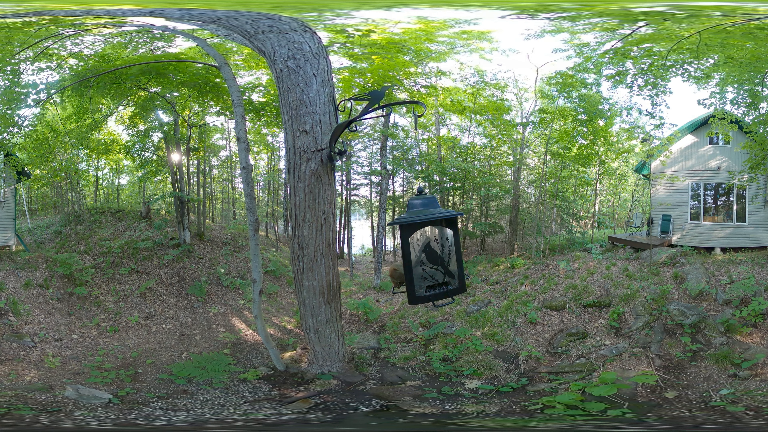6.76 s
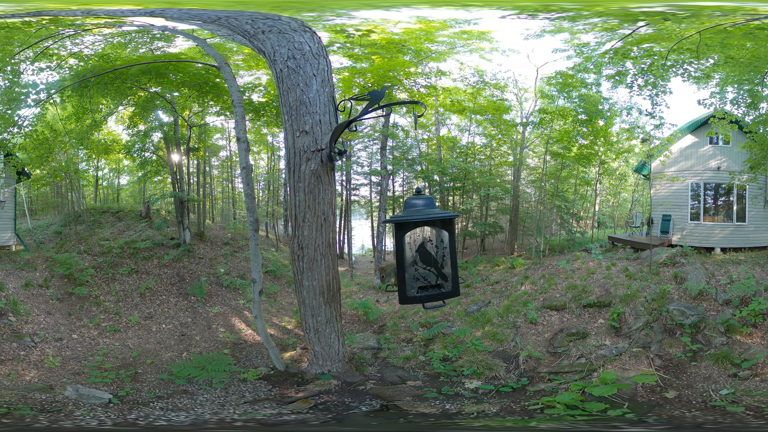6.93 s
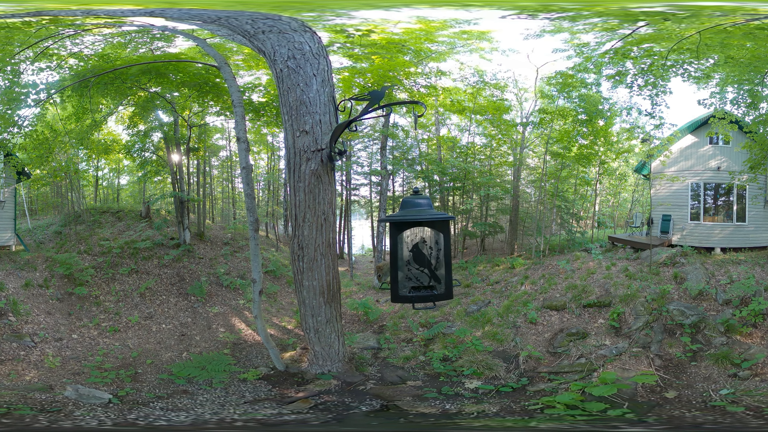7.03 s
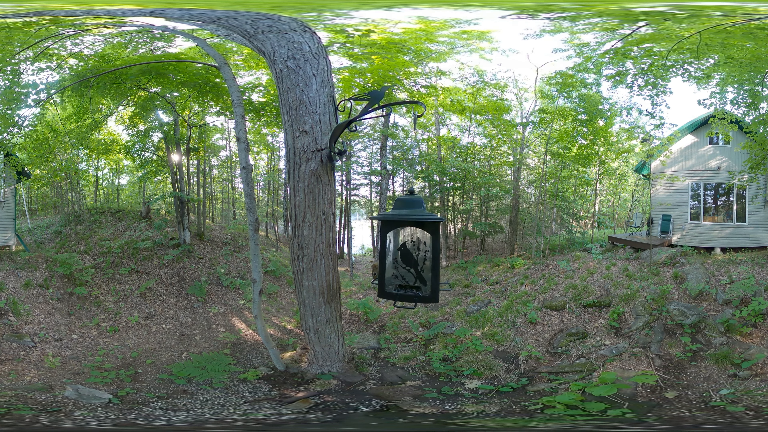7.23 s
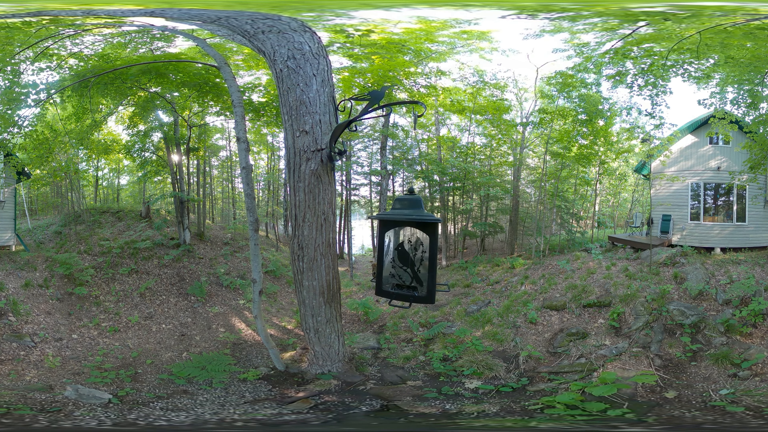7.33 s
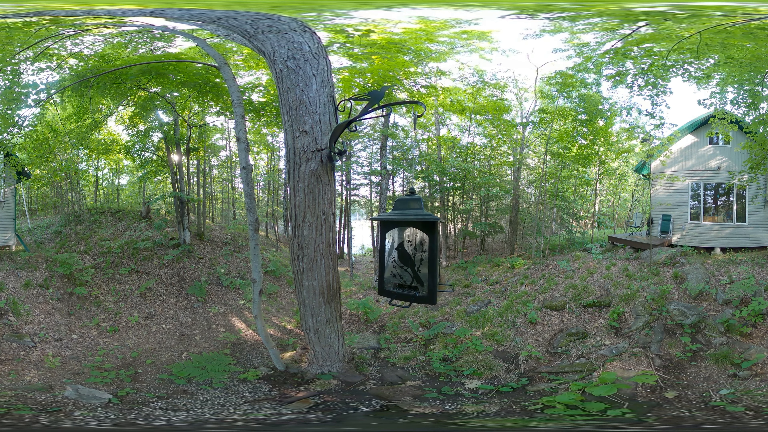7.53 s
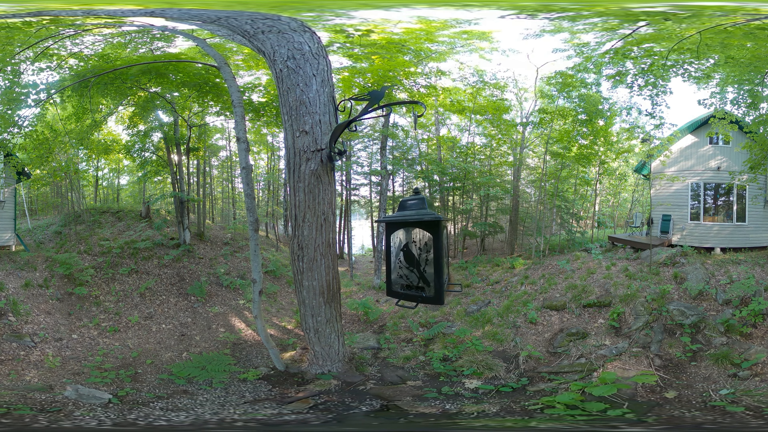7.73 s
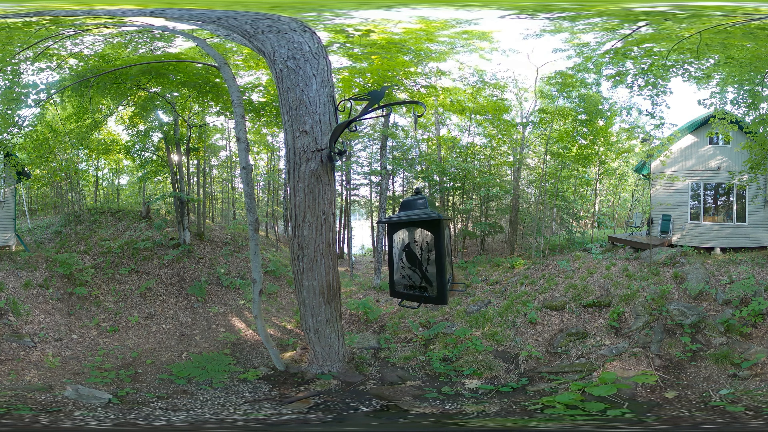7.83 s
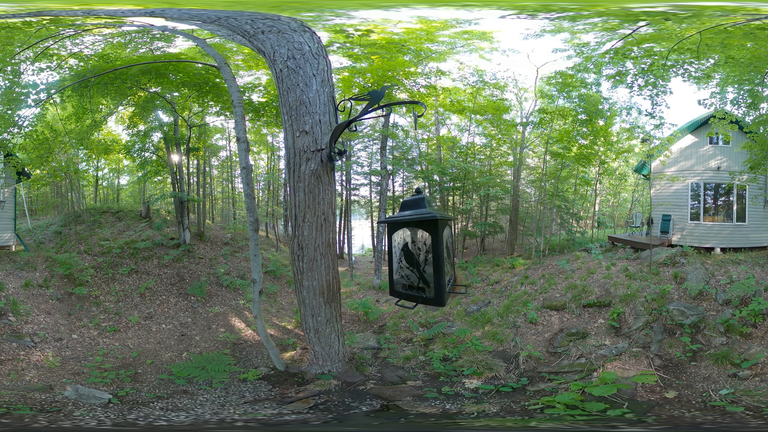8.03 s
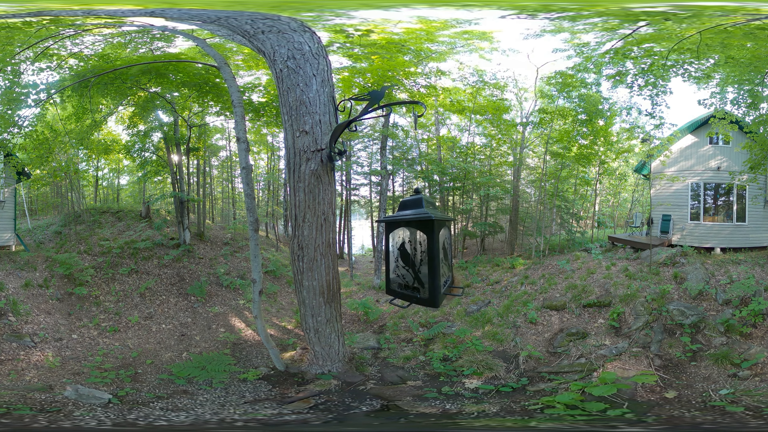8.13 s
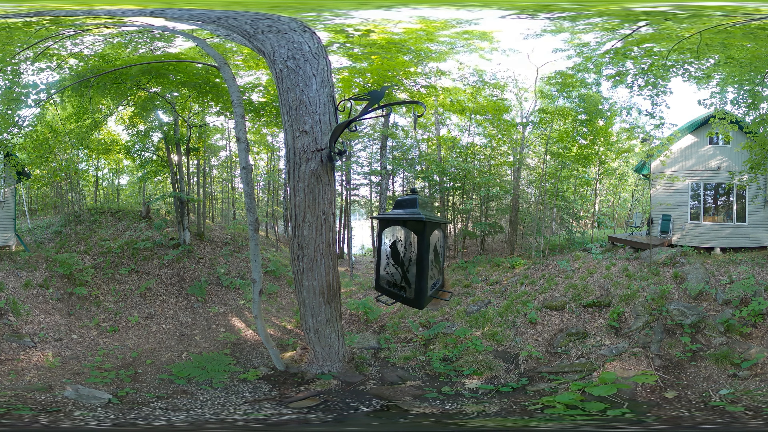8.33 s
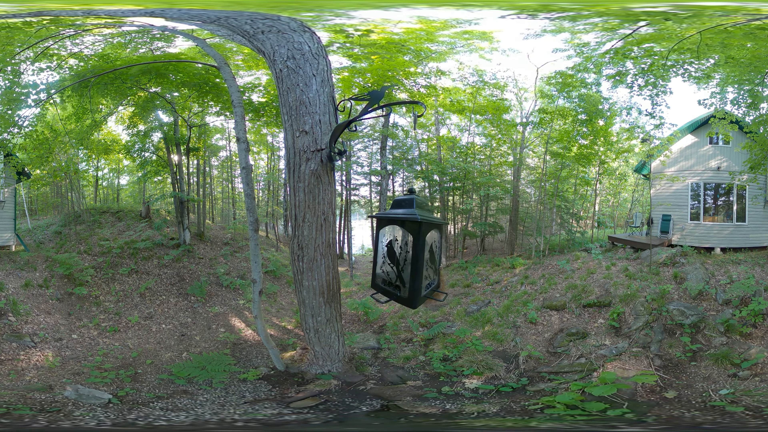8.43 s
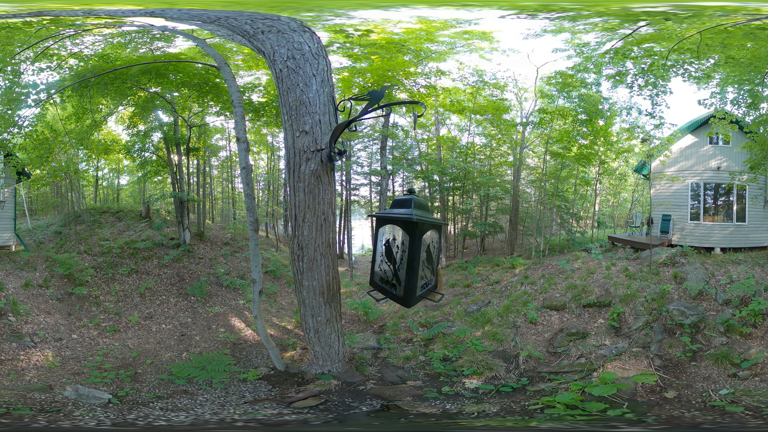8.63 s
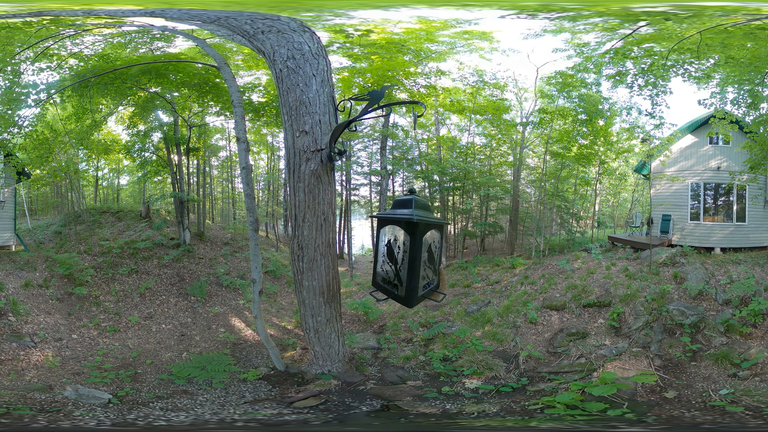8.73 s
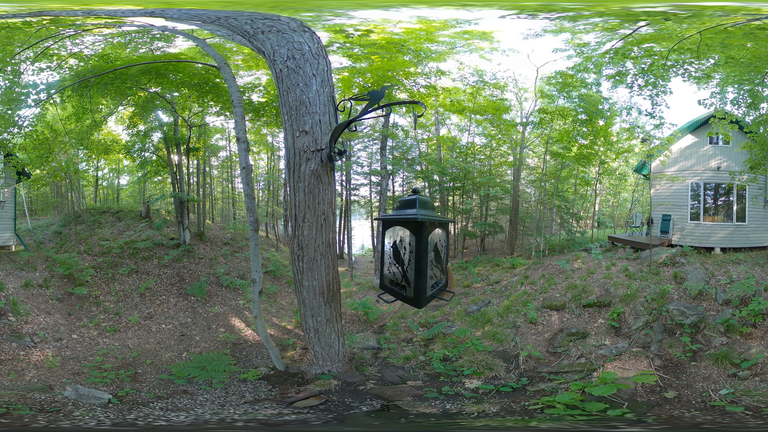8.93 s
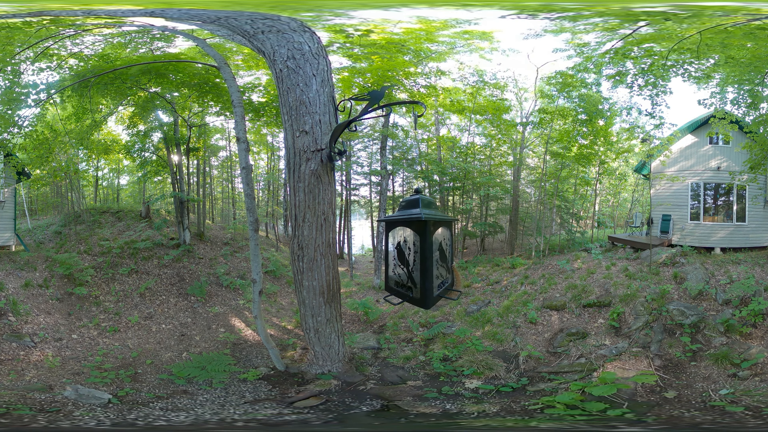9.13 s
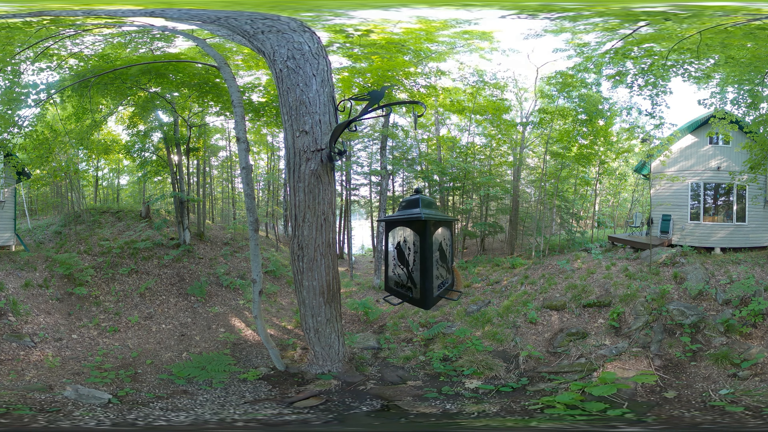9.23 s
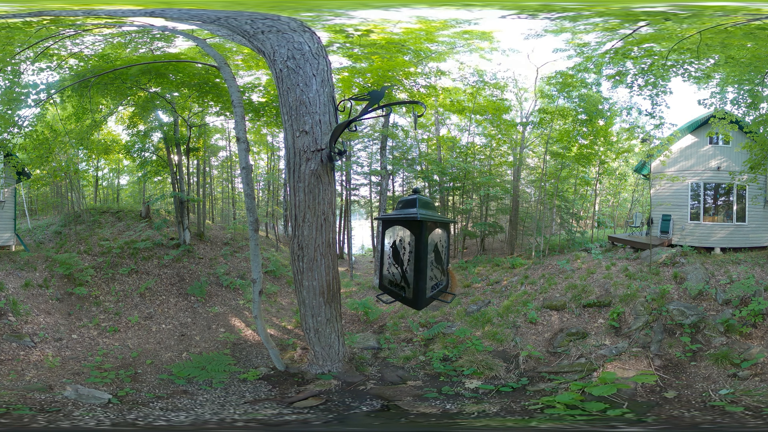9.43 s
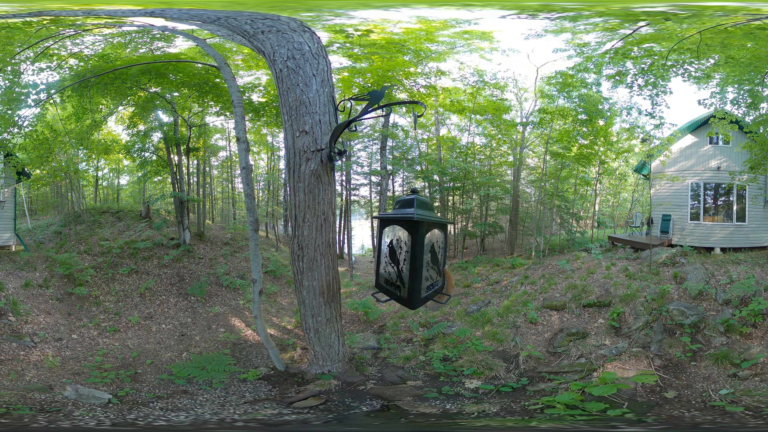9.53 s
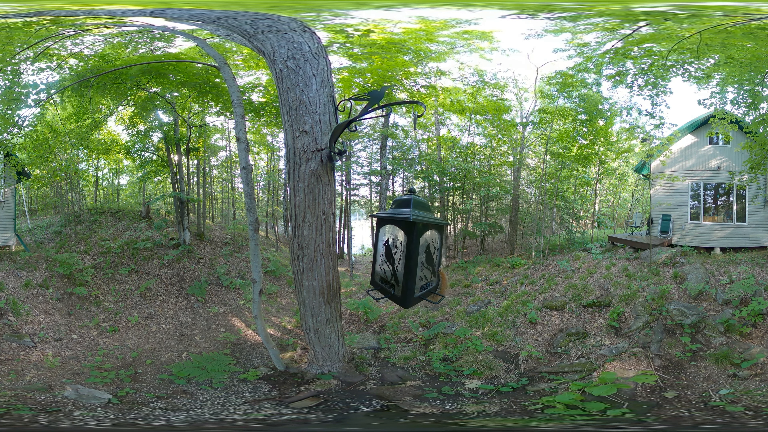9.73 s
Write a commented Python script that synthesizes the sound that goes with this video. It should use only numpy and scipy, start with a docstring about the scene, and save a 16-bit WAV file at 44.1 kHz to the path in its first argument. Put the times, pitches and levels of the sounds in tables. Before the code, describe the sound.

At 0 s a soft low thud on a hanging feeder, and at once a squirrel very near the microphone begins creaky chucks, about six a second. Each is a tiny tick and catch, a hard bright crack, then a short rasping, wavering creak. More bumps and claw scrapes come until 0.5 s. The chucks are strong and regular to about 2.3 s, where a thin squeak, a small claw click and a light bump fall. From 2.5 to 5 s they grow softer and less even, some with longer creaks. A sharp loud pair comes near 5.3 s, then quieter chucks, a brief lift around 7 s, and a gradual weakening to the end. Echoing bird whistles sound near 6.2, 8 and, clearest, 9.5 s. Occasional dry snaps and faint squeaks dot the run. Beneath lie a low air rumble and faint forest hush; the sound is close, nearly dry, slightly dull on top and almost mono.

```python
"""A soft thud on the microphone's mount, and at once a squirrel close by: creaky chucks, about six a second.
Each is a tick, a catch, a hard crack and a wavering creak: trains of some 500 pulses a second that excite
the resonances of body and mouth. Bumps ring the modes of the mount; claw scrapes and short dry snaps are
decaying noise; thin squeaks and bird whistles are gliding sines, the birds heard through scattered echoes.
Beneath lie a low rumble of air and a faint forest hush, both of them shaped noise."""
import sys
import numpy as np
from scipy import signal
from scipy.fft import rfft, irfft
from scipy.io import wavfile

SR = 44100
rng = np.random.default_rng(int(sys.argv[2]) if len(sys.argv) > 2 else 0)


def generate_wav(signal):
    """Clip the signal to [-1, 1] and save it as 16-bit WAV at the path in sys.argv[1]."""
    frames = np.transpose(np.atleast_2d(signal))
    scaled = np.clip(frames, -1, 1) * 32767
    pcm = np.round(scaled).astype(np.int16)
    wavfile.write(sys.argv[1], SR, pcm)


N = 431298
TIME = np.arange(N) / SR
# the window for one burst: samples, seconds, and frequencies in Hz (offset by 1 to avoid zero)
SIZE = 8192
LOCAL = np.arange(SIZE) / SR
BINS = np.fft.rfftfreq(SIZE, 1 / SR) + 1


def undb(db):
    """Logarithmic level: decibels become an amplitude ratio."""
    return 10 ** (np.asarray(db) / 20)


def unit(x):
    """Power normalization: scale to an rms of 1."""
    return x / np.sqrt(np.mean(x ** 2) + 1e-20)


def read(table, at):
    """Linear interpolation: a table's other columns at one value of its first."""
    first, *columns = np.transpose(table)
    return [np.interp(at, first, column) for column in columns]


def wander(t, rate):
    """Random modulation: 128 random values, rate per unit of t, joined by lines; the last one holds."""
    return np.interp(t * rate, np.arange(128), rng.standard_normal(128))


def noise(points):
    """Spectral shaping: white noise takes on a (frequency_hz, relative_level_db) curve, at rms 1."""
    hz, db = np.transpose(points)
    f = np.fft.rfftfreq(N, 1 / SR) + 1
    white = rfft(rng.standard_normal(N))
    return unit(irfft(white * undb(np.interp(np.log(f), np.log(hz), db)), N))


def edge(ratio, order):
    """Butterworth magnitude: gain falls as the ratio passes 1; an inverted ratio makes a high-pass."""
    return (1 + ratio ** (2 * order)) ** -.5


def resonate(modes, f):
    """Modal superposition: complex response of parallel resonances, neighbours of opposite sign."""
    total = 0
    for k, (hz, width, db) in enumerate(modes):
        total = total + (-1) ** k * undb(db) / (1 + 1j * (f * f - hz * hz) / (f * width))
    return total


def butter(x, hz, kind, order):
    """Linear filtering: a causal Butterworth filter."""
    return signal.sosfilt(signal.butter(order, hz, kind, fs=SR, output="sos"), x)


def add(out, s, x):
    """Superposition: mix x into out from time s."""
    i = int(round(s * SR))
    a, b = max(i, 0), min(i + len(x), len(out))
    out[a:b] += x[a - i:b - i]


def echoes(x, t60):
    """Diffuse reverberation: convolution with decaying noise of unit energy; t60 in seconds."""
    t = TIME[:SR]
    tail = rng.standard_normal(SR) * undb(-60 * t / t60) * np.minimum(t / 0.0022, 1)
    return signal.fftconvolve(x, tail / np.linalg.norm(tail))[:N]


def whistle(t, hz):
    """Frequency modulation: a slightly trembling sine that fades in and out."""
    cycles = np.cumsum(hz * (1 + 0.045 * wander(t, 600))) / SR
    return np.sin(2 * np.pi * cycles) * signal.windows.tukey(len(t), .3)


# level of the air's rumble: time_s, level_db
RUMBLE_LEVEL = [(2.8, -42.5), (5.3, -50.5), (8.8, -44.5), (9.6, -69)]
# spectrum of the still forest: frequency_hz, relative_level_db (per Hz)
FOREST_SPECTRUM = [(90, -19), (155, 2.5), (250, -4), (1500, -12.5), (8000, -15), (13000, -30)]
FOREST_DB = -60


def air():
    """Broadband noise: slow air rocks the microphone at low frequency, over a faint forest hush."""
    rumble = noise([(8, -31.0), (22, 20.0), (32, 3.0), (48, -11.0), (400, -110)])
    level_db = read(RUMBLE_LEVEL, TIME)[0]
    return rumble * undb(level_db) + noise(FOREST_SPECTRUM) * undb(FOREST_DB)


# bird calls, each a list of glide points: time_s, pitch_hz (before the tremble), level_db (before echoes)
BIRD_CALLS = [
    [(6.14, 5050, -63), (6.2, 4140, -51)],
    [(6.25, 2960, -33), (6.3, 3450, -53), (6.36, 2050, -44.5)],
    [(7.9, 2340, -53), (8.0, 2520, -51), (8.1, 3940, -43)],
    [(9.503, 4470, -20), (9.514, 6570, -41.5), (9.56, 6020, -58), (9.62, 4260, -40)],
]


def birds():
    """Pure-tone glides: each whistle moves in straight lines of pitch and level between its points."""
    out = np.zeros(N)
    for call in BIRD_CALLS:
        s, hz, db = np.transpose(call)
        t = np.arange(s[0], s[-1], 1 / SR)
        add(out, s[0], whistle(t - s[0], np.interp(t, s, hz)) * undb(np.interp(t, s, db)))
    return out


# bumps on the mount: start_s, relative_level_db, push_hz (the frequency that the push favours)
BUMPS_ON_MOUNT = [(.001, -11.5, 112.3), (0.07, -31, 150), (0.176, -16.5, 130), (0.21, -27.5, 67.6),
                  (0.432, -8, 146), (0.5, -22, 68), (1.196, -32.5, 33), (2.371, -22.5, 144.5),
                  (2.379, -34.5, 302), (2.41, -38, 71), (4.562, -38, 287), (4.588, -31, 88)]
# modes of the mount: frequency_hz, relative_level_db, t60_s
MOUNT_MODES = [(32.6, 5.5, 0.47), (68.4, 7.5, 0.35), (113.5, -3, 0.31), (140.8, -4, 0.36),
               (162.6, -7, 0.58), (200.4, -5, 0.48), (249, 0, 0.33), (328, -2, 0.44), (396, 3.5, 0.38)]
# modes that one claw click excites: frequency_hz, peak_level_db, t60_s
CLICK_MODES = [(2280, -37, .04), (2930, -42, .05)]
CLICK_S = 2.402  # start


def mount():
    """Modal excitation: soft pushes ring the modes near their own speed; one claw clicks on the mount."""
    out, t = np.zeros(N), TIME[:SR]
    for s, db, push_hz in BUMPS_ON_MOUNT:
        ring = np.zeros(SR)
        for hz, mode_db, t60 in MOUNT_MODES:
            octaves_off = np.log2(hz / push_hz)
            mode = undb(mode_db - 60 * t / t60) * np.sin(2 * np.pi * hz * t)
            ring += mode / (1 + (octaves_off / 0.23) ** 2)
        add(out, s, undb(db) * ring * (1 - np.exp(-t / 0.0097)))
    for hz, db, t60 in CLICK_MODES:
        add(out, CLICK_S, undb(db - 60 * t / t60) * np.sin(2 * np.pi * hz * t))
    return out


# scrapes of the feet: start_s, level_db (before the envelope)
FOOT_SCRAPES = [(.062, -32), (0.089, -37.5), (.2, -28.5), (.28, -38), (.437, -23.5), (0.453, -28),
                (2.376, -44)]
SCRAPE_RISE_S, SCRAPE_DECAY_S = .003, .018  # time constants


def scrapes():
    """Friction noise: claws scrape as the squirrel shifts its feet; each scrape rises fast and dies away."""
    out, t = np.zeros(N), TIME[:SIZE]
    claws = noise([(300, -2.5), (1500, -2.5), (5000, -8), (9000, -18.5)])
    claws *= undb(1.6 * wander(TIME % .5, 230))  # roughness
    scrape = (1 - np.exp(-t / SCRAPE_RISE_S)) * np.exp(-t / SCRAPE_DECAY_S)
    for s, db in FOOT_SCRAPES:
        add(out, s, undb(db) * claws[int(s * SR):][:SIZE] * scrape)
    return out


# short dry snaps: start_s, level_db (before the decay)
DRY_SNAPS = [(.421, -28.5), (1.922, -34.5), (5.256, -37), (5.403, -29), (6.891, -45), (9.135, -39.5),
             (9.753, -46)]
SNAP_DECAY_S = 0.003  # time constant


def snaps():
    """Transient noise: short dry snaps, some sharp catches just ahead of a crack, others perhaps seed shell."""
    out, t = np.zeros(N), TIME[:SIZE]
    dry_noise = noise([(1200, -11), (3500, 0.5), (5500, 0), (9000, -23.5)])
    for s, db in DRY_SNAPS:
        add(out, s, undb(db) * dry_noise[int(s * SR) - SIZE:][:SIZE] * np.exp(-t / SNAP_DECAY_S))
    return out


# small squeaks between the chucks: start_s, length_s, start_pitch_hz (before the tremble), peak_level_db
FALLING_SQUEAKS = [(0.675, 0.054, 834, -49.5), (2.255, .015, 4520, -33), (3.774, 0.038, 826, -47),
                   (4.508, 0.051, 740, -48.5), (7.775, 0.033, 695, -45.5)]


def squeaks():
    """Falling pitch: thin notes slide down by about a quarter of their starting frequency."""
    out = np.zeros(N)
    for s, length, hz, db in FALLING_SQUEAKS:
        t = TIME[:int(length * SR)]
        add(out, s, undb(db) * whistle(t, hz * (1 - 0.26 * t / length)))
    return out


# upward bends of long creaks: peak_s, rise (share of the pulse rate)
CREAK_LIFTS = [(3.403, 0.37), (4.993, 0.66), (8.777, 0.64), (9.186, 0.59), (9.396, 0.55), (9.712, 0.73)]
LIFT_S = 0.016  # half-width of a bend, to 1/e
# shares of the pulse rate, and their time constants
OVERSHOOT, OVERSHOOT_S, DROOP, DROOP_S = .14, .023, 0.2398, .01
WAVER, WAVERS_PER_S = .06, 70
# a burst slips after this time or up to twice as long: the level sags, then the rate steps
SLIP_MIN_S, SLIP_STEP, SLIP_DB = .03, .06, -10


def pulse_phase(s, length, hz, jitter):
    """Frequency integration: the varying pulse rate sums to a phase in pulses; also counts the slips."""
    left = np.maximum(length - LOCAL, 0)
    slips = LOCAL / (SLIP_MIN_S * (1 + rng.random()))
    waver = WAVER * wander(LOCAL, WAVERS_PER_S) + SLIP_STEP * wander(np.floor(slips), 0.92)
    # the rate starts high, and droops as the effort is let go
    tune = 1 + OVERSHOOT * np.exp(-LOCAL / OVERSHOOT_S) - DROOP * np.exp(-left / DROOP_S)
    tune = tune * np.exp(waver)
    lift = 1 + sum(rise * np.exp(-((s + LOCAL - peak) / LIFT_S) ** 2) for peak, rise in CREAK_LIFTS)
    # the first pulses are the most uneven
    uneven = jitter * (0.5 + np.exp(-LOCAL / .03)) * wander(LOCAL, 526.2)
    rate = hz * lift * tune / tune[left > 0].mean() * np.exp(uneven)
    return np.cumsum(rate) / SR, slips


def pulse_train(phase, on):
    """Band-limited impulses: a windowed sinc at each whole phase, placed between samples."""
    at = np.interp(np.arange(int(phase[on][-1]) + 1), phase, np.arange(SIZE))
    taps = at.astype(int)[:, None] + np.arange(16)
    offset = taps - at[:, None] - 8
    pulses = np.zeros(SIZE)
    pulses[taps] = np.sinc(offset) * np.sinc(offset / 8)
    return pulses


RASP_WIDTH_HZ, TREBLE_WIDTH_HZ = 1300, 1040
# the top resonance: frequency_hz (before the scatter), width_hz, relative_level_db
TOP_RESONANCE = (8450, 1360, -1.3)
# each pass scatters the resonances by a share and adds random spectral ripples
SCATTER, RIPPLE_DB, RIPPLE_HZ = .025, 2.2, 450


def overtones(x, rasp_hz, treble_hz):
    """Source-filter principle: pulses ring the rasp and treble resonances, a little differently each time."""
    f = BINS * np.exp(SCATTER * rng.standard_normal())
    push = rfft(x) * undb(RIPPLE_DB * wander(BINS, 1 / RIPPLE_HZ))
    rasp = resonate([(rasp_hz, RASP_WIDTH_HZ, 0)], f)
    rasp = rasp * edge(f / (1.2 * rasp_hz), order=14) * edge(0.74 * rasp_hz / f, order=5)
    treble = resonate([(treble_hz, TREBLE_WIDTH_HZ, 0), TOP_RESONANCE], f)
    treble = treble * edge(0.5 * treble_hz / f, order=6)
    return np.array([irfft(push * rasp), irfft(push * treble)])


# resonances of the hollow body with the mouth at MOUTH_HZ: frequency_hz, width_hz, relative_level_db
MOUTH_HZ = 1420
BODY_MODES = [(457, 230, 0.46), (1098, 156, 0.56), (1450, 379, 1)]
# the mouth's shape moves the resonances: time_s, body_centre_hz, treble_hz (before the scatter)
MOUTH_SHAPE = [(0, 1427, 4750), (2, 1293, 4860), (2.55, 1476, 5330), (3.65, 1426, 5440), (5.3, 1365, 5230),
               (6.9, 1284, 5360), (7.3, 1483, 5400), (8.1, 1277, 4830), (8.55, 1500, 5280)]
FLUTTER_DB, TIRE_DB_PER_S = 3.5, -13


def burst(s, length, hz, rasp_hz, body_db, rasp_db, treble_db, jitter, rasp_fade_db, hiss):
    """Source-filter principle: one train of sharp pulses from time s, rung through body and mouth."""
    mouth_hz, treble_hz = read(MOUTH_SHAPE, s)
    left = np.maximum(length - LOCAL, 0)
    on = left > 0
    phase, slips = pulse_phase(s, length, hz, jitter)
    # hard bursts start at once, soft ones swell; the level flutters, tires, and sags before each slip
    swell = 1 - np.exp(-LOCAL / (0.00033 * undb(-.8 * (max(rasp_db, -42) + 46.5))))
    flutter_db = FLUTTER_DB * wander(LOCAL, 119.5)
    sag_db = TIRE_DB_PER_S * LOCAL + SLIP_DB * (slips % 1) ** 10
    pulses = pulse_train(phase, on) * swell * undb(flutter_db + sag_db)
    # above the lowest partial the pulses differ in size and a hiss follows each
    hiss_decay = np.exp(.5 * rng.standard_normal() - (phase % 1) / .5)
    grit = hiss * hiss_decay * on * swell * rng.standard_normal(SIZE)
    rough = pulses * undb(1.7 * wander(LOCAL, 590)) + grit
    # in the body a long creak settles into a steadier tone
    settling = pulses + (rough - pulses) * np.exp(-LOCAL / 0.022)
    f = BINS * MOUTH_HZ / mouth_hz
    clean = edge(f / 850, order=4)
    drive = rfft(pulses) * clean + rfft(settling) * (1 - clean)
    passband = edge(f / 2050, order=5) * edge(265 / BINS, order=4)
    body = irfft(drive * resonate(BODY_MODES, f) * passband)
    # the upper resonances drift from one colour at the start of the burst to another at its end
    late = 1 - left / length
    fading = rough * undb(rasp_fade_db * late * np.sqrt(length / 0.0034))
    early_colour = overtones(fading * (1 - late), rasp_hz, treble_hz)
    rasp, treble = early_colour + overtones(fading * late, rasp_hz, treble_hz)
    bright = unit(unit(rasp) + unit(treble) * undb(treble_db))
    # the levels hold over the burst's own length, not over the whole window
    return (unit(body) * undb(body_db) + bright * undb(rasp_db)) * np.sqrt(length * SR / SIZE)


# the chucks: crack_s, length_s (from the crack), pulse_rate_hz (of tick and creak, before bends and
# jitter), rasp_hz (before the scatter), force_db (the crack's rasp), creak_rasp_db, treble_db (against rasp)
SQUIRREL_CHUCKS = [(0.014, 0.056, 507, 3400, -27, -36, 5), (0.168, 0.085, 574.5, 3600, -25, -36.5, -2),
                   (0.321, 0.051, 497, 3720, -24, -38, 1), (0.429, 0.072, 439, 3680, -25, -44, 1),
                   (0.592, 0.045, 590, 3500, -25, -38, 4.5), (0.771, 0.056, 636.5, 3440, -29.5, -35.5, 6.5),
                   (0.974, 0.047, 555, 3720, -27.5, -43, 2), (1.128, 0.046, 563, 3700, -27.5, -42, 2.5),
                   (1.293, 0.048, 578, 3340, -30.5, -41.5, 4.5), (1.452, 0.051, 542.4, 3720, -27, -40.5, 1),
                   (1.616, 0.047, 638.5, 3600, -27.5, -36, 2.5), (1.768, 0.053, 587, 3650, -30, -40.5, 2),
                   (1.931, 0.047, 617, 3500, -29.5, -40, 2), (2.106, 0.047, 625, 3400, -30, -36.5, 4.5),
                   (2.293, 0.081, 507, 3640, -27, -41, -1), (2.477, 0.043, 540.5, 3940, -30, -45, 4),
                   (2.624, 0.046, 557, 4470, -29, -54, -0.5), (2.749, 0.046, 483, 4050, -31, -47, -6.5),
                   (2.856, 0.043, 473, 3670, -33.5, -50, -10.5), (2.977, 0.045, 477, 3020, -41, -55, -13),
                   (3.145, 0.035, 477.5, 3760, -38, -59, -1), (3.32, 0.12, 580, 3640, -30.5, -48.5, -1.5),
                   (3.53, 0.043, 513, 3730, -36.5, -49, -5), (3.658, 0.071, 551.4, 3680, -39, -45, -3.5),
                   (3.828, 0.01, 463, 3530, -38, -60, -6), (3.903, 0.024, 456, 3450, -61, -48, -7),
                   (4.009, 0.11, 550, 3530, -29, -42.5, -3), (4.204, 0.1, 479, 3500, -31.5, -47, 1),
                   (4.374, 0.1, 513.5, 3280, -37, -46.5, 1.5), (4.57, 0.054, 568.5, 3100, -42.5, -51.5, 4),
                   (4.687, 0.13, 499.5, 3570, -36.5, -49.5, -4), (4.906, 0.1, 547, 3220, -40, -43.5, -3),
                   (5.117, 0.05, 545, 3700, -35.5, -49.5, 8), (5.267, 0.055, 582.4, 4250, -24, -37, 2.5),
                   (5.411, 0.052, 523, 3700, -29.5, -43.5, 2.5),
                   (5.565, 0.061, 538, 3430, -35.5, -43.5, -7.5), (5.732, 0.068, 556, 3160, -42.5, -45, -4),
                   (5.914, 0.045, 616, 3350, -35.5, -41.5, -1.5), (6.071, 0.063, 536, 3070, -43, -49, -3.5),
                   (6.267, 0.053, 542, 3140, -39, -41, -6.5), (6.455, 0.045, 486, 2830, -43.5, -50.5, -8.5),
                   (6.602, 0.051, 482, 2870, -44, -42.5, -14), (6.726, 0.098, 442, 2920, -40.5, -46, -16),
                   (6.923, 0.053, 516, 3200, -30, -40, -4), (7.101, 0.043, 557.5, 3300, -30.5, -42, 2.5),
                   (7.258, 0.042, 539, 3430, -39.5, -47, -5), (7.378, 0.052, 540, 3600, -39.5, -47.5, -4.5),
                   (7.543, 0.052, 605.6, 3400, -34.5, -45.5, 3.5),
                   (7.695, 0.052, 585, 2970, -37.5, -48, -8.5),
                   (7.827, 0.081, 525.4, 3040, -41.5, -47, -12), (7.972, 0.051, 522, 2860, -41, -47, -10.5),
                   (8.092, 0.069, 457, 2930, -39, -46.5, -5), (8.259, 0.046, 475, 3000, -44, -50, -5.5),
                   (8.429, 0.05, 538, 3350, -42, -50, 2), (8.595, 0.045, 589, 3570, -42, -51, 4.5),
                   (8.705, 0.081, 568, 3670, -42, -53.5, 3), (8.905, 0.062, 584, 3380, -44, -52, 2),
                   (9.095, 0.1, 539, 3160, -47, -51, 0), (9.349, 0.072, 592, 3180, -52, -52, 3.5),
                   (9.559, 0.17, 509.4, 4200, -50.5, -54, -5.5)]
# weak chucks are smooth, hard ones abrupt: force_db, body_db (before the offsets below),
# tick_db (before a random spread), crack_length_s, creak_fade_db (of rasp and treble, over 3.4 ms;
# longer creaks change by the square root of their length)
FORCE_RESPONSE = [(-53, -41, -70, 0.022, -0.5), (-41, -34.5, -38, .014, -0.5),
                  (-37.5, -35.2, -43, .012, -4)]
# the manner of calling drifts: time_s, catch_db (after a usual rest, before the offset below)
CALLING_MANNER = [(0, -37), (2.1, -44), (3.3, -51.5), (4.5, -40), (8.3, -39), (9.4, -56.5)]
# a strong catch starts earlier and holds longer: catch_db, lead_s (ahead of the crack), length_s
CATCH_TIMES = [(-48.5, 0.01, .003), (-41.5, 0.01, .004), (-37, 0.014, .008)]
# the catch is strongest when one chuck follows hard on another
USUAL_REST_S, CATCH_FADE_DB_PER_S = .1, 67.5
CATCH_OVER_DB, CATCH_RASP_UNDER_DB = 0.5, -12
TICK_LEAD_S, TICK_S, TICK_RASP_UNDER_DB = .031, .0035, -16
CRACK_OVER_DB, CREAK_OVER_DB, CREAK_DELAY_S = 2.5, -0.5, .021


def squirrel():
    """Pulsed phonation: tick, catch, crack, then creak; in weak chucks crack and creak run together."""
    out, last_end = np.zeros(N), -USUAL_REST_S
    for s, length, hz, rasp_hz, force_db, creak_db, treble_db in SQUIRREL_CHUCKS:
        extra_rest = s - last_end - USUAL_REST_S
        last_end = s + length
        catch_db = read(CALLING_MANNER, s)[0] - CATCH_FADE_DB_PER_S * extra_rest
        lead, hold = read(CATCH_TIMES, catch_db)
        body_db, tick_db, crack_s, fade_db = read(FORCE_RESPONSE, force_db)
        tick, catch, creak = s - TICK_LEAD_S, s - lead, s + CREAK_DELAY_S
        tick_body_db = tick_db + 2 * rng.standard_normal()
        add(out, tick, burst(tick, TICK_S, hz, rasp_hz, tick_body_db, tick_db + TICK_RASP_UNDER_DB,
                             treble_db, jitter=0.19, rasp_fade_db=-26.0, hiss=0.47))
        catch_rasp_db = np.clip(force_db + CATCH_RASP_UNDER_DB, catch_db - 7, catch_db + 4.5)
        add(out, catch, burst(catch, hold, 0.7 * hz, rasp_hz, catch_db + CATCH_OVER_DB, catch_rasp_db,
                              treble_db, jitter=.07, rasp_fade_db=3, hiss=0.38))
        add(out, s, burst(s, crack_s, 1.1 * hz, rasp_hz, body_db + CRACK_OVER_DB, force_db,
                          treble_db, jitter=0.0803, rasp_fade_db=-1.0, hiss=0.2))
        if length > CREAK_DELAY_S:
            add(out, creak, burst(creak, length - CREAK_DELAY_S, hz, rasp_hz, body_db + CREAK_OVER_DB,
                                  creak_db, treble_db, jitter=0.07, rasp_fade_db=fade_db, hiss=0.28))
    return out


def scene():
    """Direct and diffuse sound: the squirrel is close and nearly dry, the birds come mostly by the trees."""
    near, far = squirrel() + squeaks() + scrapes() + snaps(), birds()
    close_echo = undb(-9.5) * echoes(butter(near, 1300, "high", order=1), t60=0.11)
    trees = echoes(undb(-26) * near + far, t60=0.66)
    mid = near + close_echo + trees + far + mount() + air()
    # a faint, mostly high stereo spread is added by decaying noise
    high = undb(-8.5) * butter(mid, 9700, "high", order=6)
    side = echoes(high + undb(-55.5) * near, t60=0.0033)
    return np.array([mid + side, mid - side])


TOP_HZ = 15800


def record(dry):
    """Band limiting: the microphone falls away steeply near 8 kHz, with a faint band just above."""
    main = butter(dry, 7910, "low", order=12)
    faint = butter(butter(dry, 7900, "high", order=2), 10800, "low", order=2)
    dull = main + undb(-12.5) * faint
    return signal.sosfilt(signal.ellip(8, .2, 70, TOP_HZ, fs=SR, output="sos"), dull)


dry = scene()
out = record(dry)
generate_wav(out)
```